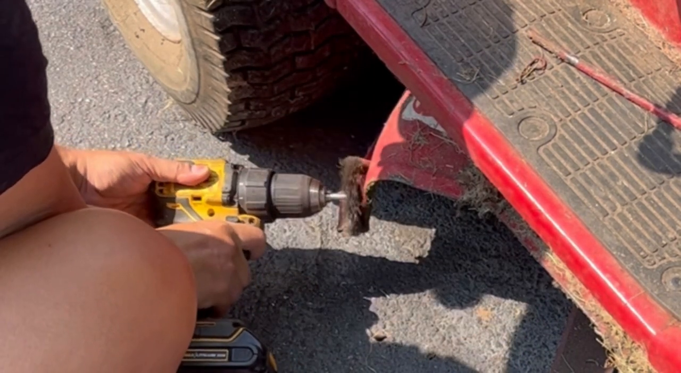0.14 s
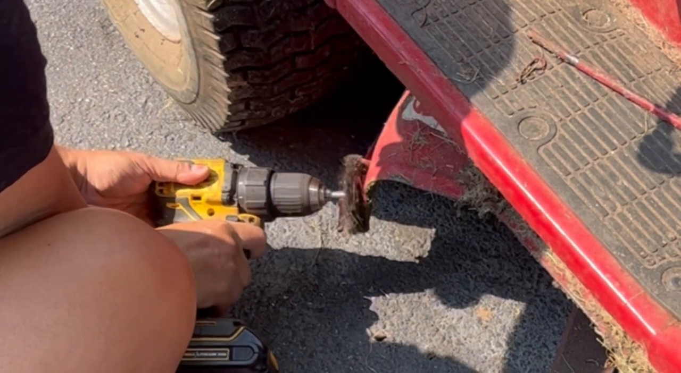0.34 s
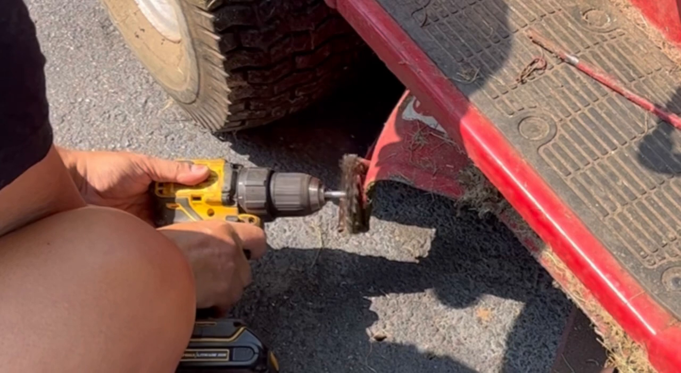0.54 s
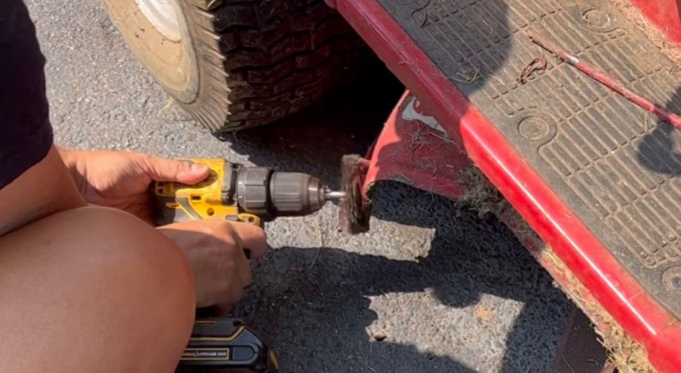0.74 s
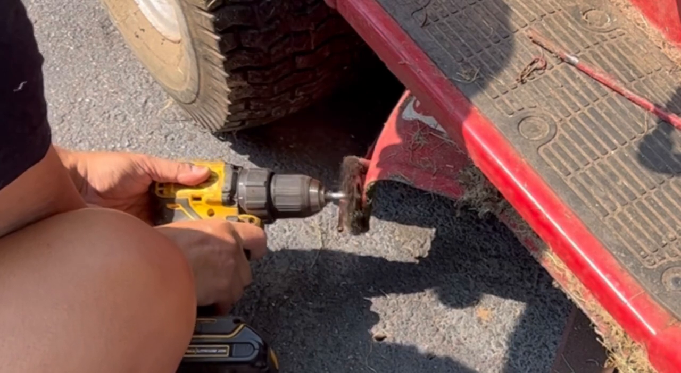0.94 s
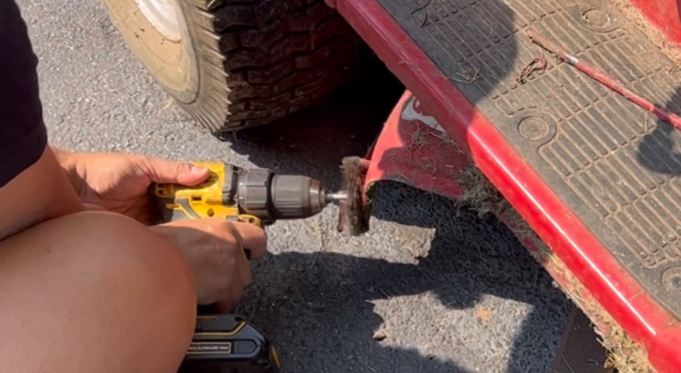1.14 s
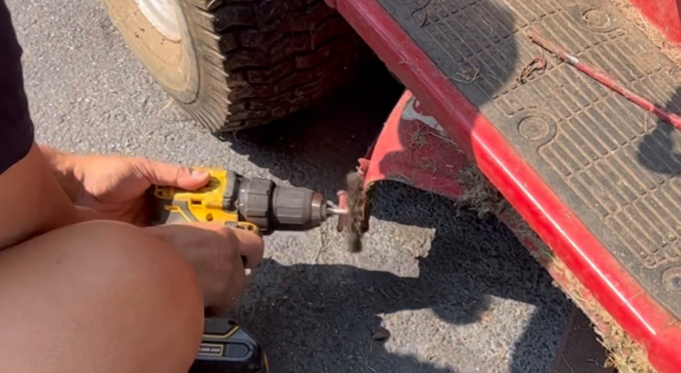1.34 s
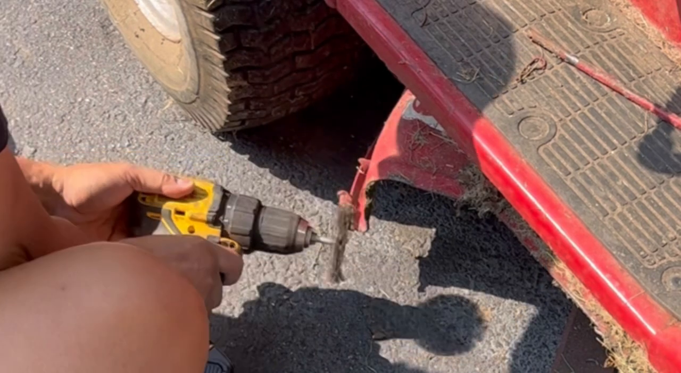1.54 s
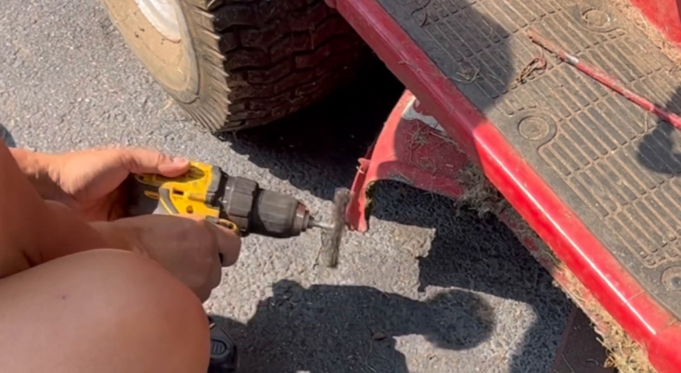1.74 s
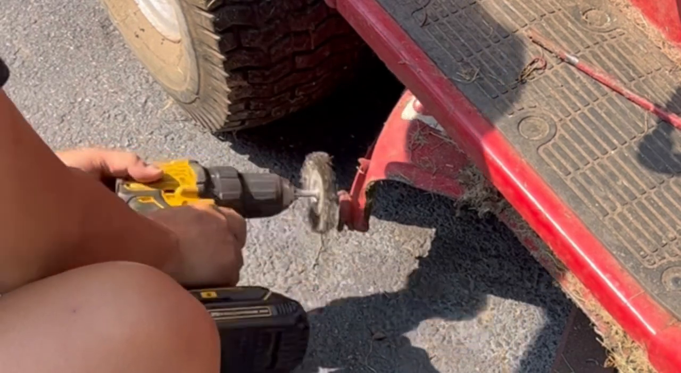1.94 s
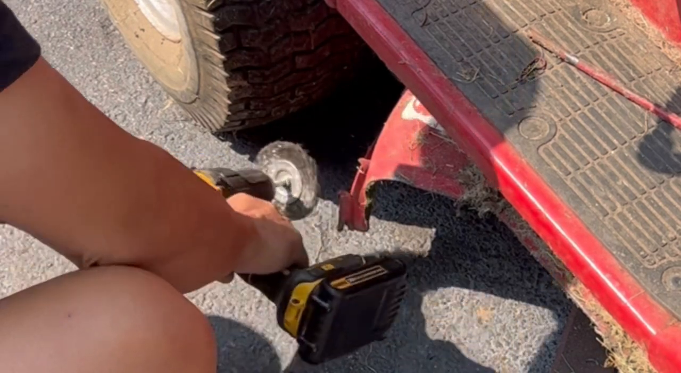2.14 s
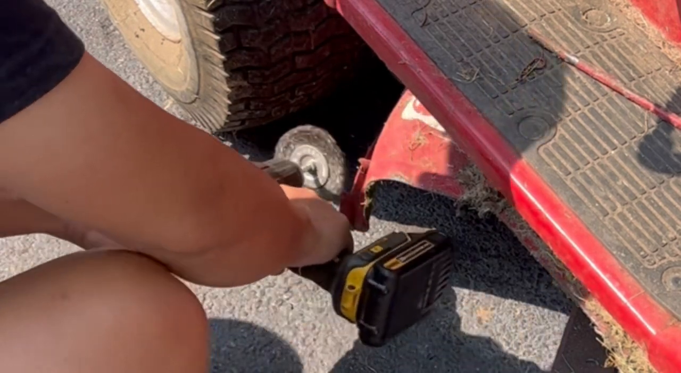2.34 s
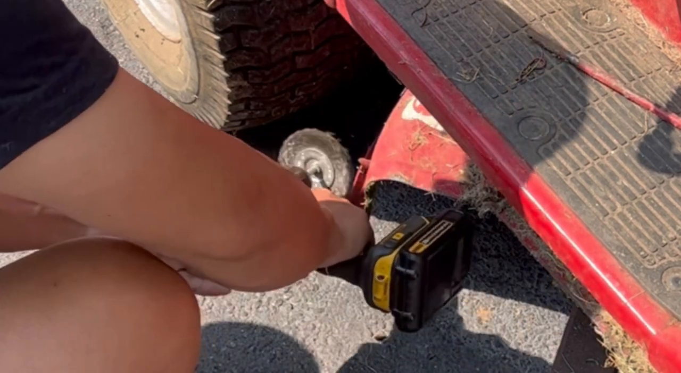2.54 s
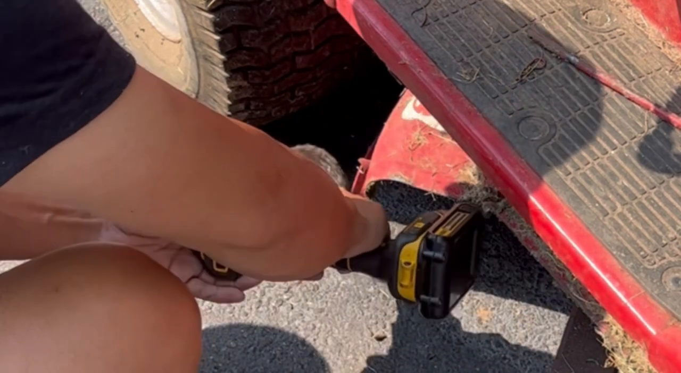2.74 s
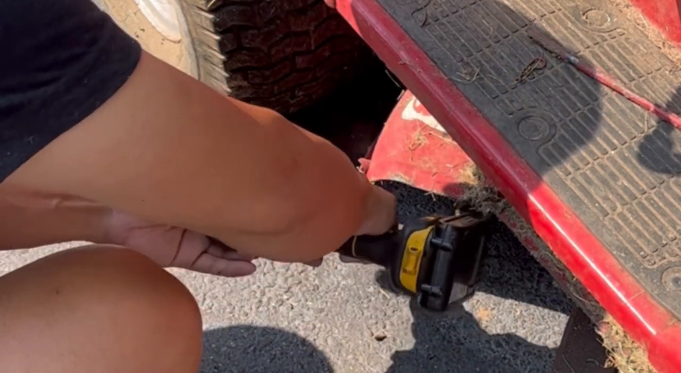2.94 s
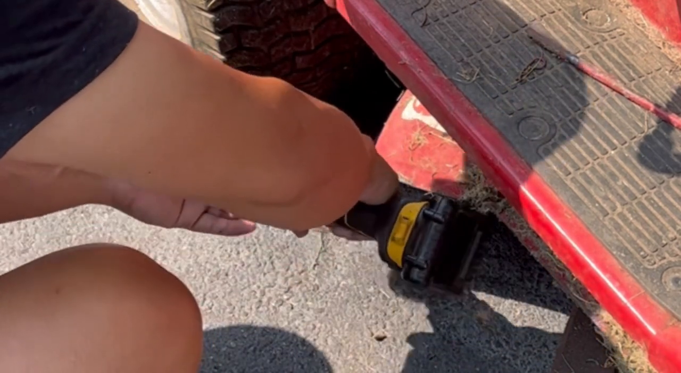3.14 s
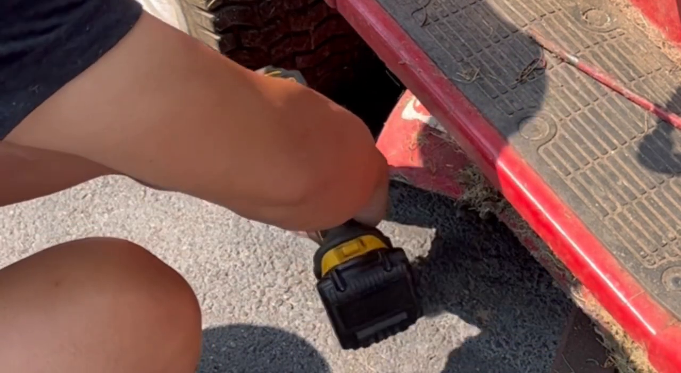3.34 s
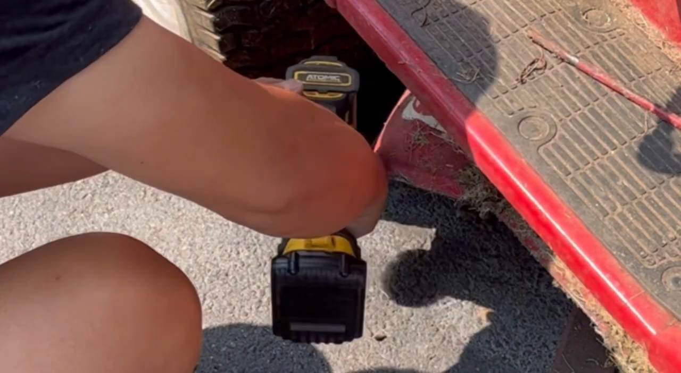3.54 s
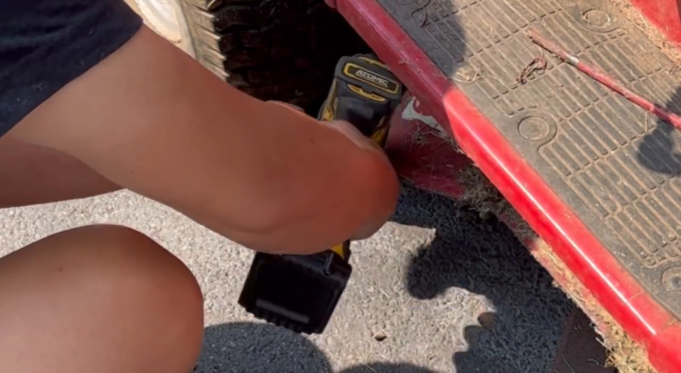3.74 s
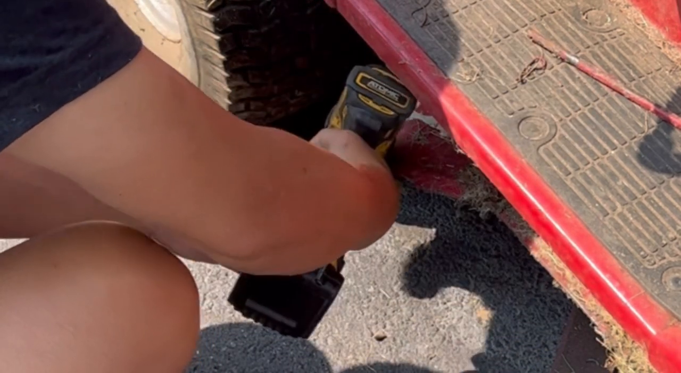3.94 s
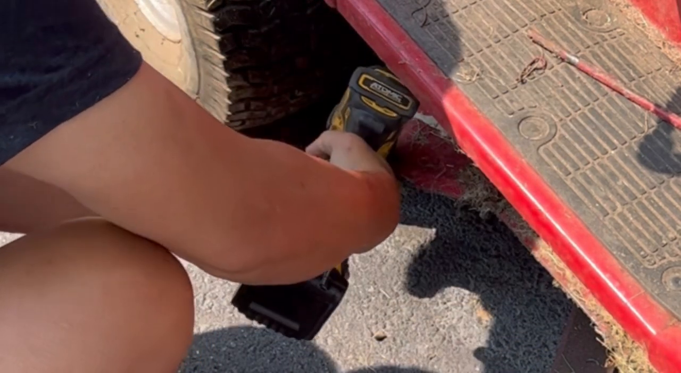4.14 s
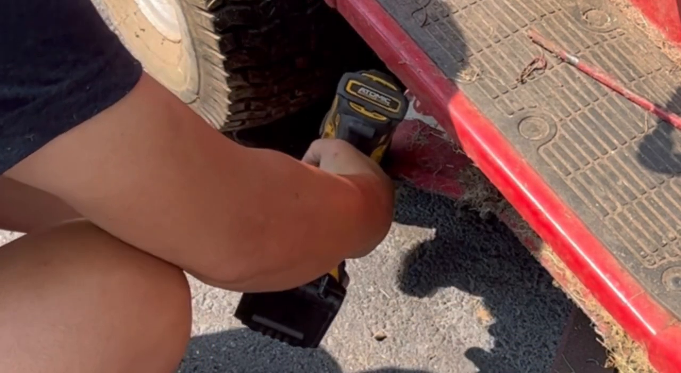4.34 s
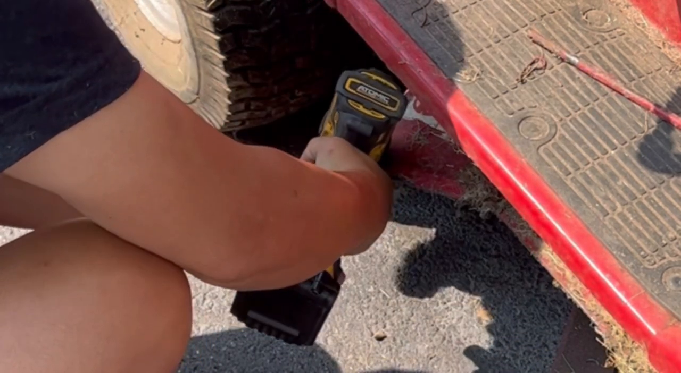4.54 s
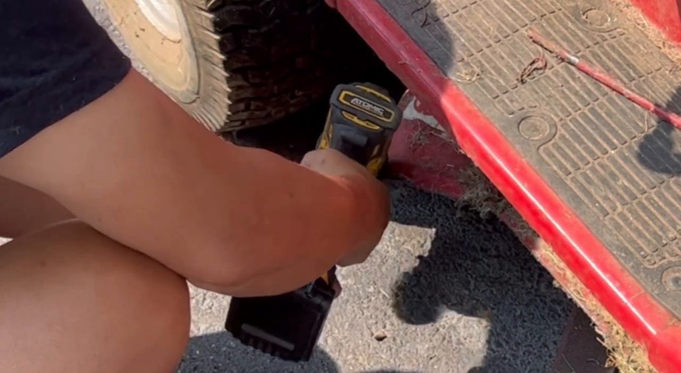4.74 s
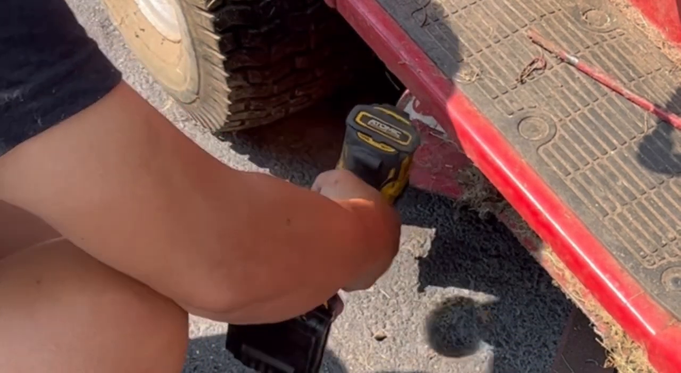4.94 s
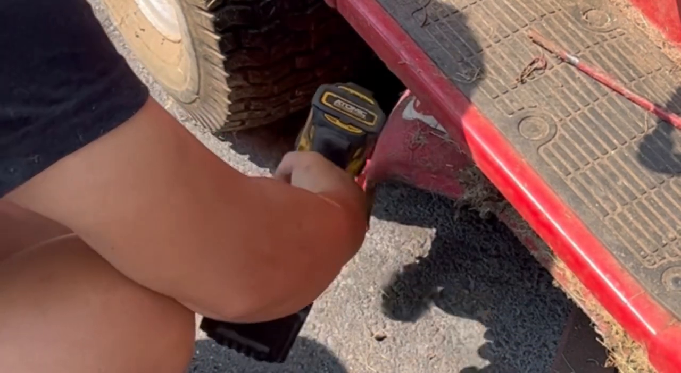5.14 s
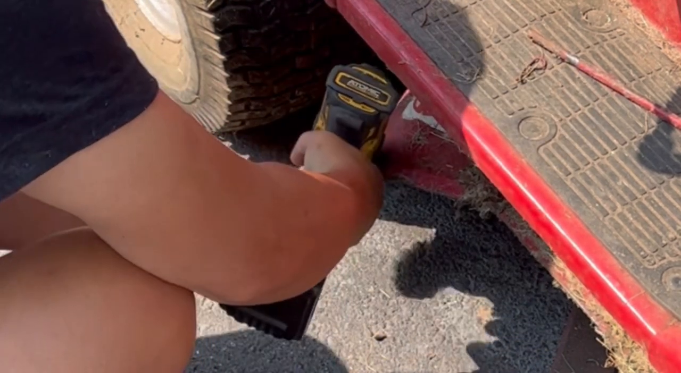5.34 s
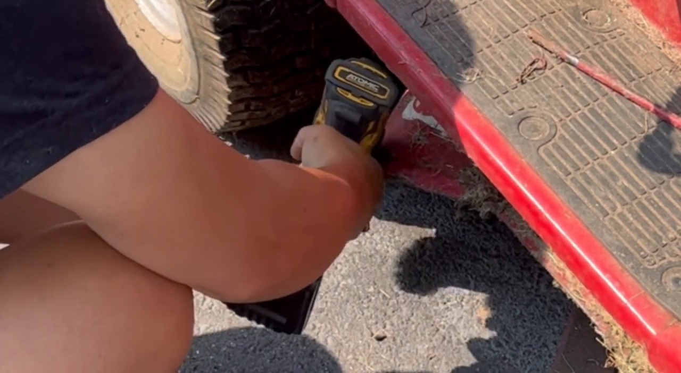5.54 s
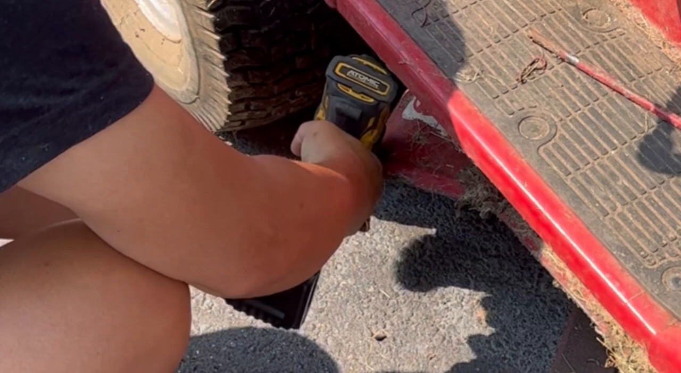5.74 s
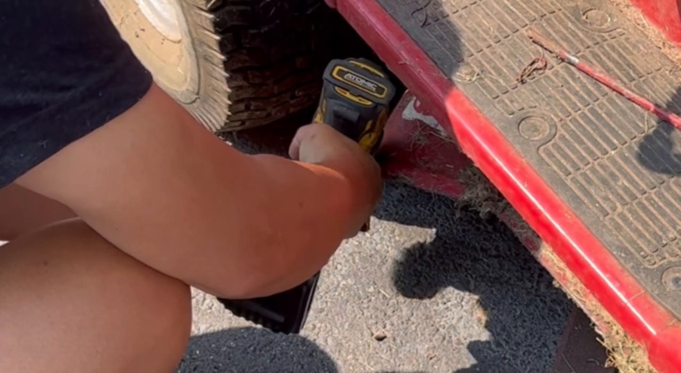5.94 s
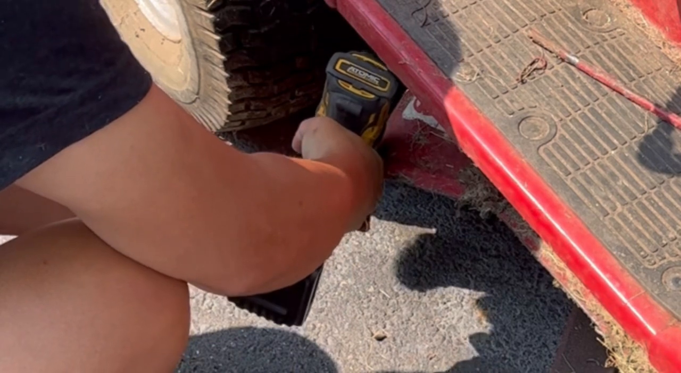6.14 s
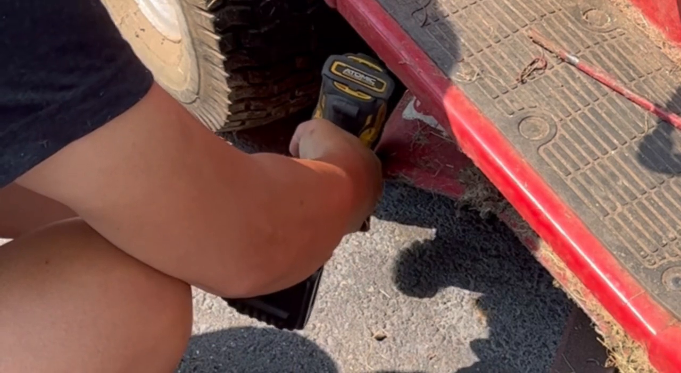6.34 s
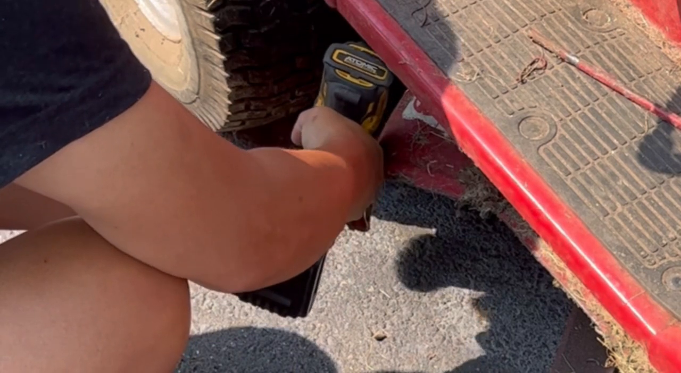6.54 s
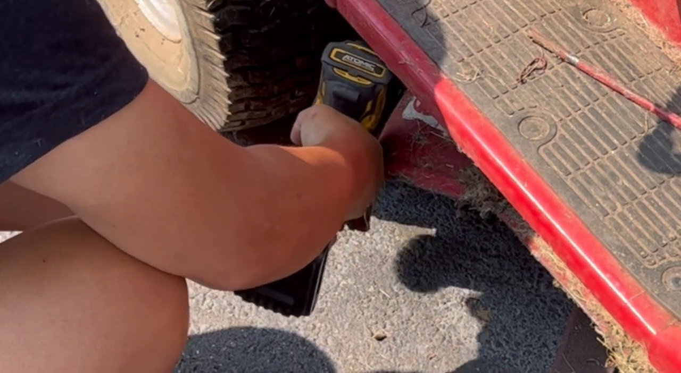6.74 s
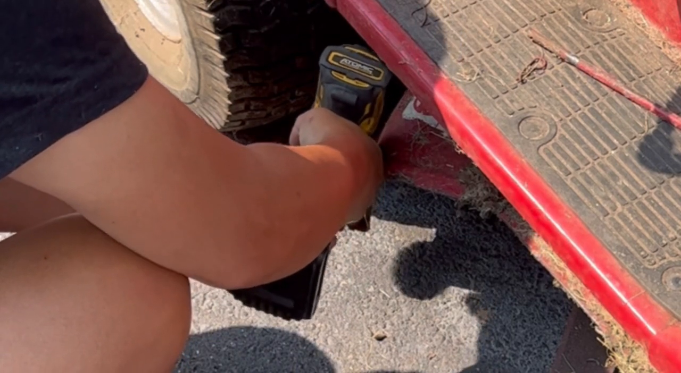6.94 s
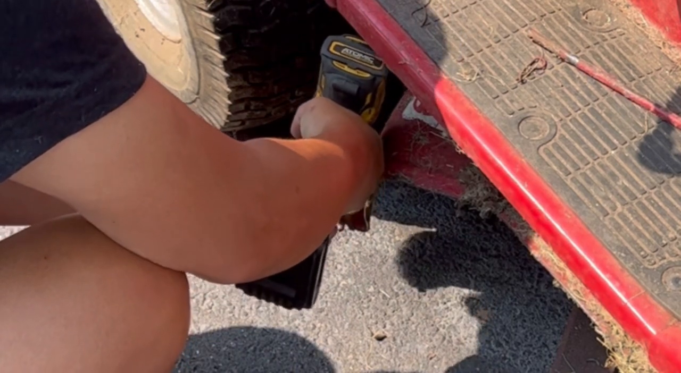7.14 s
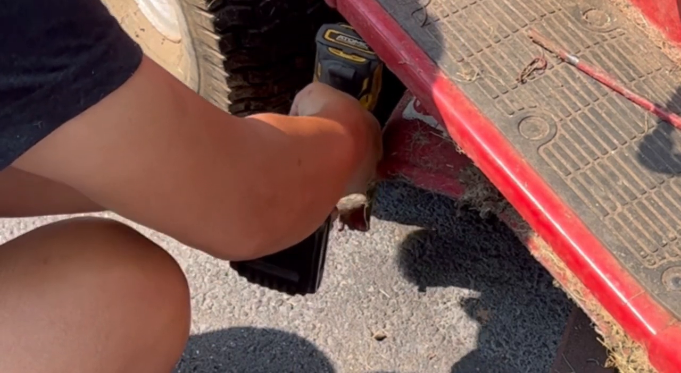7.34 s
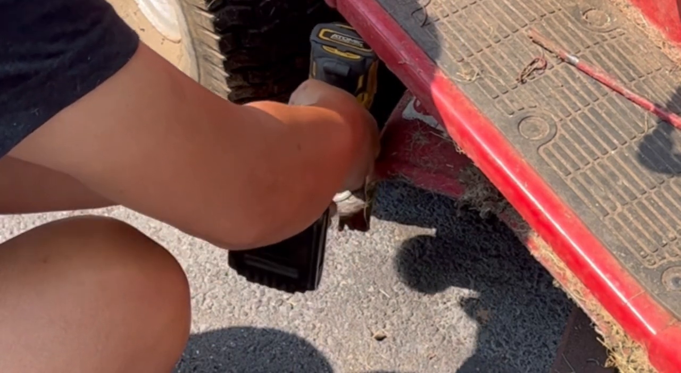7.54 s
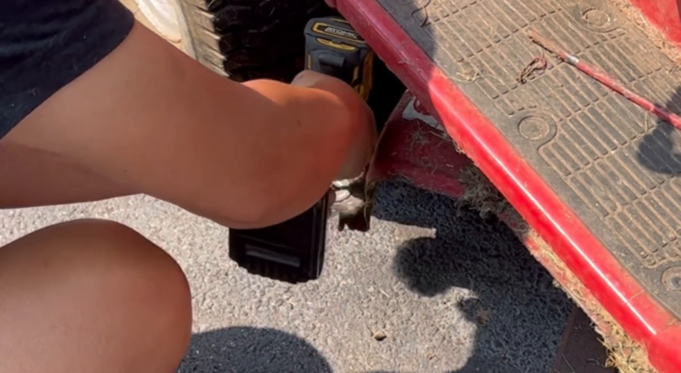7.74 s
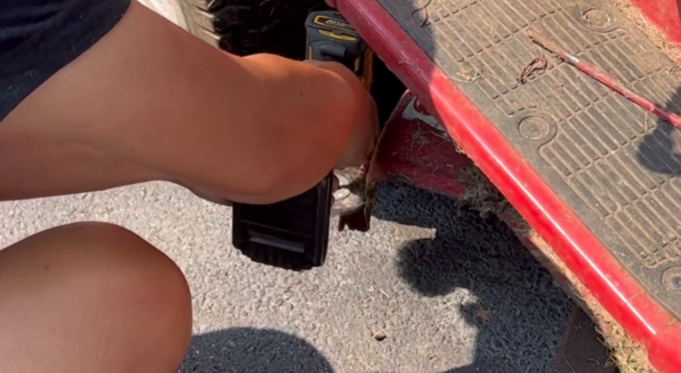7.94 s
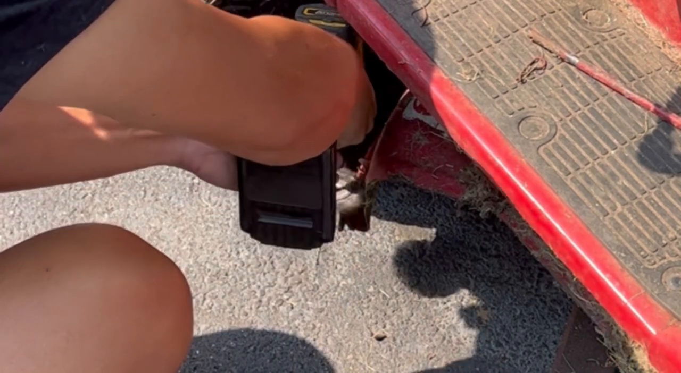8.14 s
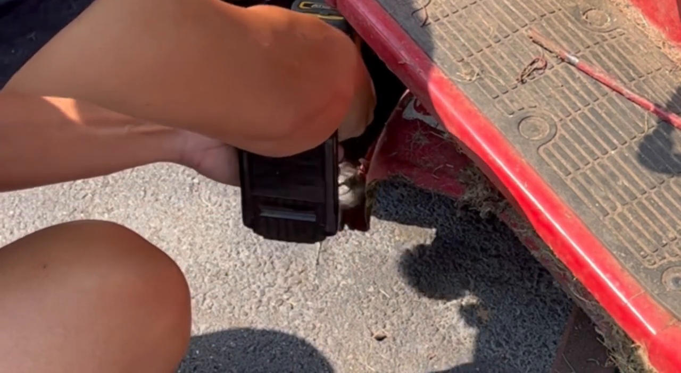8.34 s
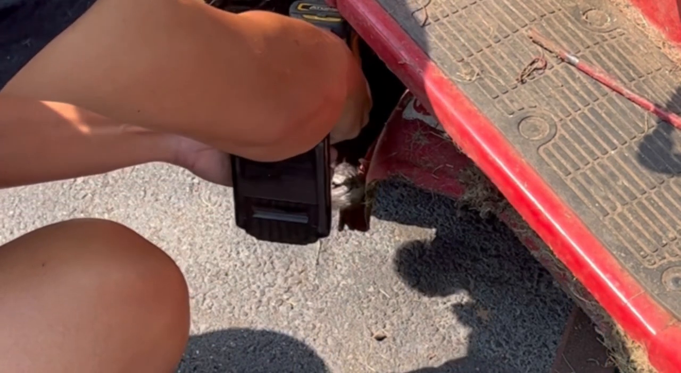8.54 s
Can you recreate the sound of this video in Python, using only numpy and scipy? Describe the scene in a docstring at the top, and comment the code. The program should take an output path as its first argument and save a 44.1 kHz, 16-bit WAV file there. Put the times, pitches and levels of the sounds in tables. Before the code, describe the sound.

Outdoors, close to the work, a low small engine chugs throughout. A drill-driven wire wheel sizzles brightly on a thin steel edge, lifts away into whine and swish, briefly touches the metal, dips in speed, then revs higher. It scrubs a hollow deck with a drumming roar, snags once with sharp clanks, and rasps deeper beneath.

```python
"""Outdoors, a small engine chugs throughout while a cordless drill spins a wire wheel on a steel mower deck.
First the wires sizzle on the ringing edge of the sheet; then the wheel runs free and brushes the deck once.
The trigger is let go for an instant, the wheel scrubs the hollow deck faster, snags once with clanks,
and at last rasps on a panel farther under. Random wire strikes drive filters and damped modes for the brush;
whine, rattle and swish follow the motor speed, which the trigger sets and the drag of the work pulls down."""
import sys
import numpy as np
from scipy import signal
from scipy.fft import rfft, irfft
from scipy.io import wavfile
from scipy.ndimage import map_coordinates

SR = 44100
rng = np.random.default_rng(int(sys.argv[2]) if len(sys.argv) > 2 else 0)


def inscribe(sig):
    """Save sig as 16-bit PCM at rate SR to the path in sys.argv[1].

    A 1-D sig is mono; a 2-D sig holds one channel per row.
    Samples are clipped to [-1, 1] before scaling.
    """
    pcm = np.round(np.clip(np.atleast_2d(sig).T, -1, 1) * 32767)
    wavfile.write(sys.argv[1], SR, pcm.astype(np.int16))


N = 378819
T = np.arange(N) / SR
HZ = np.fft.rfftfreq(N, 1 / SR)


def amp(db):
    """Decibels to gain."""
    return 10 ** (np.asarray(db) / 20)


def unit(x):
    """Scales to rms 1."""
    return x / np.sqrt(np.mean(x ** 2) + 1e-20)


def curves(rows):
    """Every column of a time table, interpolated at every sample."""
    times, *columns = np.transpose(rows)
    return [np.interp(T, np.sort(times), column) for column in columns]


def read(points, hz=HZ):
    """A frequency table, interpolated on a log axis."""
    f, value = np.transpose(points)
    return np.interp(np.log(hz + 1), np.log(np.sort(f) + 1), value)


def drift(rate_hz):
    """Slow random motion of rms 1."""
    coarse = T[::64]
    points = rng.standard_normal(4000)
    motion = map_coordinates(points, [coarse * rate_hz * 2], order=3, mode="mirror")
    return np.interp(T, coarse, unit(motion))


def shaped(x, gain):
    """Filters x by a gain per frequency; rms 1."""
    return unit(irfft(rfft(x) * gain, N))


def ringing(modes):
    """Frequency response of a set of damped modes."""
    response = 0
    for hz, width, db in modes:
        response = response + amp(db) / (1 + 1j * (HZ ** 2 - hz ** 2) / (width * HZ + 1e-6))
    return response


def wandering(strikes, modes, swing_db, per_s):
    """Each mode swells and fades at random on its own; rms 1."""
    spectrum = rfft(strikes)
    voices = [irfft(spectrum * ringing([mode]), N) * amp(swing_db * drift(per_s)) for mode in modes]
    return unit(sum(voices))


def resonate(x, hz, width):
    """A resonance whose centre follows the curve hz; rms 1."""
    turn = np.exp(2j * np.pi * np.cumsum(hz) / SR)
    r = np.exp(-np.pi * width / SR)
    # shift the centre down to 0 Hz, smooth there, shift back up
    return unit((turn * signal.lfilter([1 - r], [1, -r], x / turn)).real)


RIPPLE_DB = 3  # depth of the fine ripple, as the standard deviation of its random points


def fine_ripple(depth_db, spacing_hz):
    """Random fine ripple over frequency, which gives the hiss and swish a slightly tonal grain."""
    ripple = np.interp(HZ / spacing_hz, np.arange(2000), rng.standard_normal(2000))
    return amp(depth_db * ripple)


def turns(rate, waver):
    """Angle of a shaft whose speed is never quite steady."""
    return 2 * np.pi * np.cumsum(rate * (1 + waver * drift(25))) / SR


def push(start, length, attack, release):
    """Envelope that rises, holds and dies away exponentially."""
    rise = 1 - np.exp(-np.clip(T - start, 0, length) / attack)
    return rise * np.exp(-np.clip(T - start - length, 0, 1) / release)


def strokes(rows):
    """Envelope of short contacts: a quick bite (1.2 ms) and a slower release (4.4 ms)."""
    envelope = 0
    for s, length, db in rows:
        ramp = np.minimum((T - s) / 0.0012, (s + length - T) / 0.0044)
        envelope = envelope + amp(db) * np.clip(ramp, 0, 1)
    return envelope


# the engine's exhaust note, four times the firing rate:
# (time [s], note [Hz], level of the note [dB], level of its octave [dB])
EXHAUST_NOTE = [(0.1, 103, -32, -33.5), (1.22, 102.7, -30.5, -41), (2.04, 104.7, -36.5, -38.5),
                (2.88, 105.2, -24.5, -56), (2.95, 105.4, -26.5, -31), (3.42, 103.9, -26, -32.5),
                (3.84, 104.2, -32, -31), (4.38, 104.6, -27, -30.5), (4.89, 105.3, -22.5, -31.5),
                (5.97, 103.9, -21.5, -46), (6.32, 104.1, -22.5, -30.5), (6.84, 104.9, -22.5, -37),
                (7.17, 104.5, -22.5, -31.5), (7.37, 104.3, -23.5, -39.5), (8.48, 103.5, -23.5, -39),
                (8.5, 103.3, -24.5, -36)]
# the engine's other orders: (multiple of the firing rate [-], level [dB])
ENGINE_ORDERS = [(2, -45), (3, -65), (5, -41.5), (6, -37.5), (7, -38.5), (9, -44), (10, -46.5), (11, -44.5),
                 (12, -41), (13, -68), (14, -48), (16, -54), (18, -76), (28, -51.5)]
# the overtones come and go:
# (time [s], level shift of the other orders [dB], level of the hum at 20 times the firing rate [dB])
OVERTONE_LEVELS = [(0, -1, -56), (1.4, 1.5, -51), (2.1, -1, -53), (2.45, 0.5, -47), (3.45, -2, -42.5),
                   (3.7, 0.5, -47), (5.1, -1, -43.5), (6.5, -5.5, -50), (7.35, -5.5, -39), (7.7, 2, -45),
                   (8.59, 0, -52)]
# colour of the low rumble: (frequency [Hz], relative level per Hz [dB])
RUMBLE_COLOUR = [(15, -33), (35, 5), (52, 16.5), (80, 12.5), (130, 7), (250, 2), (450, -14), (1500, -56)]


def engine(smear=.19):
    """A single cylinder fires about 26 times a second; the muffler smears each puff and booms on order four."""
    note_hz, note_db, octave_db = curves(EXHAUST_NOTE)
    cycle = turns(note_hz / 4, waver=.002)
    overtones_db, hum_db = curves(OVERTONE_LEVELS)
    orders = [(round(k), amp(db + overtones_db)) for k, db in ENGINE_ORDERS]
    orders += [(4, amp(note_db)), (8, amp(octave_db)), (20, amp(hum_db))]
    puffs = np.zeros(N)
    for k, level in orders:
        phase = k * cycle + smear * k ** 2 + .5 * drift(0.498)
        puffs += level * np.cos(phase) * (1 + 0.051 * drift(5.5))
    # the rumble throbs once per firing
    throb = rng.standard_normal((2, N)) * (1 + 1.1 * np.cos(cycle))
    rumble = shaped(throb, amp(read(RUMBLE_COLOUR)))
    spread = np.array([[.3], [-.3]])  # left, right
    return np.sqrt(2) * puffs + amp(-34.5) * (rumble[0] + spread * rumble[1])


# dull knocks as the drill is swung and kicks:
# (time [s], level [dB], pitch [Hz], time to the envelope's peak and its decay [s])
DRILL_KNOCKS = [(3.01, -15.5, 69.5, 0.01), (3.09, -24, 65.5, .012), (3.44, -16, 71.4, 0.011),
                (3.563, -19, 62.2, 0.0093), (4.635, -22, 70, .012), (4.754, -20, 94.9, 0.01),
                (4.793, -11, 109.6, 0.0033), (5.728, -17, 65.5, 0.0069), (6.196, -21, 64.5, 0.0098)]


def knocks():
    """Low, heavily damped blows."""
    out = np.zeros(N)
    for s, db, hz, decay in DRILL_KNOCKS:
        age = np.clip(T - s, 0, .5)
        envelope = (age / decay) * np.exp(1 - age / decay)
        out -= amp(db) * np.sin(2 * np.pi * hz * age) * envelope
    return out


# drag of the work on the wheel: (time [s], speed lost [motor turns per s])
WORK_DRAG = [(2.84, 0), (2.91, 7), (2.96, 6), (3.02, 0), (3.52, 0), (3.65, 6), (3.72, 3), (3.82, 8),
             (3.95, 0), (4.25, 4), (4.33, 14), (4.47, 15), (4.55, 22), (4.7, 23), (4.8, 66), (4.85, 24),
             (4.9, 8), (5.02, 1), (5.26, 0), (5.5, 20.5), (6, 20), (6.2, 23.5), (6.85, 20), (7.15, 21),
             (7.21, 28), (7.3, 23), (7.52, 19), (7.62, 25), (7.76, 24), (7.8, 41), (7.95, 27), (8.18, 24),
             (8.25, 33), (8.35, 31), (8.5, 22)]


def speed_sag():
    """The drag of the work takes turns per second off the motor."""
    return curves(WORK_DRAG)[0]


# finger moves on the trigger: (time [s], speed asked for [motor turns per s], time to settle [s])
TRIGGER_MOVES = [(0, 244, .05), (1.25, 262, .05), (1.385, 310, .13), (1.53, 264, .07), (1.93, 260, .05),
                 (2.2, 264.5, .08), (2.47, 260, .04), (2.6, 264, .05), (2.8, 259, .1), (3.095, 150, .25),
                 (3.272, 332, .034), (3.84, 340, .04), (4.472, 394.5, .038)]
UNSTEADY = .0012  # rms share by which the speed wanders


def motor_speed(sag):
    """Turns per second: the motor settles on what the trigger asks for, less the sag under load."""
    speed = np.full(N, float(TRIGGER_MOVES[0][1]))
    for s, asked, settle in TRIGGER_MOVES[1:]:
        at = round(s * SR)
        speed[at:] = asked + (speed[at] - asked) * np.exp(-T[:N - at] / settle)
    return (speed - sag) * (1 + UNSTEADY * drift(3))


def pace(speed):
    """Motor speed as a share of its highest."""
    return speed / speed.max()


# gear rattle as the drill is turned about: (time [s], level [dB])
RATTLE_LEVEL = [(0, -35), (1.25, -33.5), (1.5, -32.5), (2.3, -35), (2.9, -31.5), (3.6, -31), (5.2, -32),
                (7, -33.5), (7.8, -33), (8.59, -35.5)]
# modes of the plastic housing that it shakes: (frequency [Hz], width [Hz], relative level [dB])
HOUSING_MODES = [(786, 38, -8), (1046, 89, 5), (1318, 300, -1), (1786, 104, -1)]


def gear_rattle(speed):
    """Gear teeth chatter once a motor turn and shake the plastic housing."""
    chatter = rng.standard_normal((2, N)) * (1 + 0.2 * np.cos(turns(speed, 0.0021)))
    return amp(curves(RATTLE_LEVEL)[0]) * shaped(chatter, ringing(HOUSING_MODES))


# gearbox resonances that the whines at 16 and 19 times the shaft sweep through: (frequency [Hz], level [dB])
LOW_WHINE_RESPONSE = [(3400, -39), (4050, -33), (4250, -32.5), (4500, -26), (4750, -27), (5000, -30),
                      (5300, -35), (5450, -34), (5700, -31), (5980, -36), (6300, -35)]
HIGH_WHINE_RESPONSE = [(4000, -42), (4400, -39), (5000, -43), (5600, -40), (6200, -35), (6450, -33),
                       (6900, -29.5), (7100, -28.5), (7500, -27.5)]
# each whine swells and fades as the drill is turned about: (time [s], level shift [dB])
LOW_WHINE_SWING = [(1.3, -6), (1.5, 0), (1.7, -4), (1.85, -8), (2, -2), (2.09, -9), (2.2, -3), (2.3, 5),
                   (2.45, -2), (2.54, -9), (2.7, 0), (2.82, -4), (2.95, -1), (3.15, -4), (3.25, -2),
                   (3.31, 5), (3.5, 0), (3.7, -8), (3.9, -1), (4.22, 1), (4.35, -7), (4.75, -6), (4.84, 1),
                   (4.94, 3), (5.1, -4), (5.7, -8), (6, -1), (6.3, -4), (6.9, 4), (7.2, -9), (8.59, -10)]
HIGH_WHINE_SWING = [(1.35, -10), (1.5, 0), (2.15, -1), (2.3, -12), (2.43, 3), (2.9, -3), (3.2, 0), (3.3, 5),
                    (3.5, -1), (3.73, -7), (3.9, 0), (4.35, 1), (4.6, -2), (4.8, -4), (4.95, 2), (5.08, -5),
                    (5.22, 3), (5.4, 0), (7.12, 0), (7.23, -6), (7.32, 1), (7.8, -1), (7.99, 1.5),
                    (8.12, -17), (8.26, 2.5), (8.37, -12), (8.5, 2)]
# weaker motor orders: (multiple of the shaft [-], level at full speed before radiation [dB], width [Hz])
FUZZY_ORDERS = [(4, -38, 30), (8, -47, 110), (14, -50, 60)]
# how well the drill body radiates them: (frequency [Hz], gain [dB])
BODY_RADIATION = [(900, -5), (1150, 7.5), (1350, -6), (1550, -4.5), (2100, 12.5), (2650, 13.5), (2950, 0),
                  (3130, 11.5), (3700, -14), (4600, 16), (5200, -16)]
BACKLASH_RAD = 1.9  # play of the loose gears, rms


def gear_whine(speed, rough=0.19, fade_db=1.6, jitter_rad=0.47):
    """Two clear tones locked to the shaft, swelling as the drill is turned, and fuzzier orders from loose gears."""
    shaft = turns(speed, waver=0.001065)
    clear = [(16, LOW_WHINE_RESPONSE, LOW_WHINE_SWING), (19, HIGH_WHINE_RESPONSE, HIGH_WHINE_SWING)]
    out = np.zeros(N)
    for k, response, swing in clear:
        level_db = read(response, k * speed) + curves(swing)[0] + fade_db * drift(4.5)
        level = amp(level_db) * (1 + rough * drift(22))
        out += level * np.cos(k * shaft + jitter_rad * drift(70))
    for k, db, width in FUZZY_ORDERS:
        tone = np.sqrt(2) * np.cos(k * shaft + BACKLASH_RAD * drift(width / 2))
        fuzz = tone * (1 + rough * drift(width / 2))
        out += amp(db + read(BODY_RADIATION, k * speed)) * fuzz * pace(speed) ** 3.0
    return out


def wire_strikes(speed, per_s, spread_db, wobble, flutter_db):
    """Two unrelated showers of wire tips; the uneven wheel presses harder once a turn and the hand shakes."""
    wheel = turns(speed / 14, .02)  # the wheel turns once per 14 motor turns
    hit = rng.random((2, N)) < per_s * speed / speed.mean() / SR
    size = rng.laplace(size=(2, N))[hit]
    strikes = np.zeros((2, N))
    strikes[hit] = np.sign(size) * amp(spread_db * np.minimum(abs(size), 4))
    return strikes * (1 + wobble * np.cos(wheel)) * amp(flutter_db * drift(18))


# swish of the spinning wires and the motor fan: (frequency [Hz], relative level per Hz [dB])
SWISH_COLOUR = [(300, -17), (900, -1.5), (2400, -5), (3100, -3), (3700, 4.5), (4200, 1), (4700, -1.5),
                (5300, -7.5), (6500, -0.5), (8100, 2), (10500, -3), (12000, -4.5), (13500, -4),
                (15500, -11.5)]
# parts of the deck that ring under even a light touch: (frequency [Hz], width [Hz], relative level [dB])
LIGHT_TOUCH_MODES = [(1940, 140, 11), (2240, 370, -3), (2580, 220, 8.5), (3550, 250, -4.5), (3870, 96, 4.5),
                     (4670, 95, 4)]
FIZZ_HZ = 7900  # the swish above this has an extra growth with speed


def swish(speed, sag, hiss_db=-25.5, hiss_power=1.73, ring_db=-31.5, ring_power=8.2,
          fizz_db=1, fizz_power=0.77, load_db=2.5, full_sag=22):
    """Wires cut the air and brush lightly: louder and brighter as a power of speed, a little louder under load."""
    strikes = wire_strikes(speed, per_s=20000, spread_db=1.0, wobble=0.03, flutter_db=0.5)
    ring = wandering(strikes, LIGHT_TOUCH_MODES, swing_db=2.5, per_s=5)
    hiss = shaped(strikes, amp(read(SWISH_COLOUR)) * fine_ripple(depth_db=RIPPLE_DB, spacing_hz=59.15))
    fizz = irfft(rfft(hiss) * (HZ > FIZZ_HZ), N)
    fast = pace(speed)
    load = np.minimum(sag / full_sag, 1)
    hiss = hiss - fizz + fizz * amp(fizz_db) * fast ** fizz_power
    hiss_level = amp(hiss_db + load_db * load) * fast ** hiss_power
    return hiss_level * hiss + amp(ring_db) * fast ** ring_power * ring


# the wheel works its way deeper under the deck: (time [s], level [dB])
REACH_LEVEL = [(7.2, -52), (7.9, -42), (8.2, -36), (8.59, -36)]
# modes of the panel that rings there: (frequency [Hz], width [Hz], relative level [dB])
INNER_PANEL_MODES = [(980, 60, -2), (1450, 67, 11), (2120, 81, 8), (2970, 60, -7), (3660, 130, -8),
                     (4598, 70, -5)]


def inner_panel(speed):
    """Far under the deck the wires rasp roughly on another panel."""
    strikes = wire_strikes(speed, per_s=3000, spread_db=3.0, wobble=0.21, flutter_db=5.5)
    return amp(curves(REACH_LEVEL)[0]) * shaped(strikes, ringing(INNER_PANEL_MODES))


# the wires catch and rasp: (time [s], length [s], level [dB])
WIRE_SNAGS = [(4.727, 0.022, -15.5), (4.75, 0.016, -18), (4.766, 0.018, -20), (4.778, 0.026, -19.5),
              (6.41, 0.035, -24), (7.785, 0.033, -28)]
# colour of that rasp: (frequency [Hz], relative level per Hz [dB])
SNAG_COLOUR = [(200, 15), (600, -26), (1300, 8), (2000, 5), (3100, 13.5), (5000, 6), (8000, 4), (12000, -1),
               (15500, -25)]
# the wheel skids over a rim and makes it shriek: (time [s], length [s], level [dB])
RIM_SKIDS = [(7.786, .043, -26.5)]
# modes of the rim: (frequency [Hz], width [Hz], relative level [dB])
RIM_MODES = [(2490, 60, -9), (3910, 70, -1), (5200, 116, -7), (6790, 160, -6)]


def snags(speed):
    """Bunches of wires catch and spring free, or skid over a ringing rim."""
    strikes = wire_strikes(speed, per_s=3700, spread_db=0.0, wobble=0.05, flutter_db=-1.9)
    rasp = strokes(WIRE_SNAGS) * shaped(strikes, amp(read(SNAG_COLOUR)))
    shriek = strokes(RIM_SKIDS) * shaped(strikes, ringing(RIM_MODES))
    return rasp + shriek


# the snagged wheel bangs on the deck: (time [s], peak level [dB])
BANGS = [(4.731, -7.5), (4.743, -12), (4.761, -14), (4.768, -8), (4.782, -12), (4.791, -11)]
# deck modes that clank: (frequency [Hz], width [Hz], relative level before the uneven mix [dB])
CLANK_MODES = [(1090, 44, -1), (1360, 35, -8), (1940, 30, 1), (2730, 55, -3), (2970, 50, 2), (3500, 35, 0),
               (4760, 50, -5), (5790, 120, -8)]


def clanks(uneven_db=3):
    """Each blow lands on another spot and rings the deck's modes in another mix."""
    out, t = np.zeros(N), T[:SR // 5]
    for s, db in BANGS:
        spots = rng.standard_normal((len(CLANK_MODES), 2))
        ring = np.zeros(len(t))
        for (hz, width, level), (a, b) in zip(CLANK_MODES, spots):
            strength = amp(level + uneven_db * a) * np.sign(b)
            ring += strength * np.sin(2 * np.pi * hz * t) * np.exp(-np.pi * width * t)
        out[round(s * SR):][:len(t)] += amp(db) * ring / abs(ring).max()
    return out


# pressure on the edge of the sheet, easing off as the drill is drawn away: (time [s], level [dB])
EDGE_LEVEL = [(0, -21.5), (.45, -18.5), (.9, -19), (1.23, -24), (1.275, -25.5), (1.6, -38.5), (2.1, -42),
              (2.4, -90)]


def edge_force():
    """Pressure of the wheel on the edge, as a gain."""
    return amp(curves(EDGE_LEVEL)[0])


# the wires glance off the edge again: (time [s], length [s], level [dB])
EDGE_GLANCES = [(2.86, 0.072, -38), (3.76, 0.076, -32), (3.86, 0.24, -35), (4.05, 0.2, -32)]
# hiss of the edge: (frequency [Hz], relative level per Hz [dB])
EDGE_COLOUR = [(120, -18), (250, 9), (400, 6.5), (600, -2), (900, -3), (1300, -3.5), (1900, -7.5),
               (3000, -1.5), (3700, 1), (4400, 0), (5100, 0.5), (6600, 1.5), (7500, 2), (9200, -60),
               (10500, -5), (13000, -6.5), (15500, -17)]
# ringing modes of the edge: (frequency [Hz], width [Hz], relative level [dB])
EDGE_MODES = [(2090, 36, -17), (2465, 29, -10), (2860, 78, -23), (3810, 106, -3), (4000, 64, -5),
              (4100, 42, -4.5), (4722, 42, 2), (5460, 55, -5.5), (5870, 130, -20), (6750, 150, -6),
              (6840, 50, -11), (9070, 100, -2.5), (9560, 150, -3)]
EDGE_LEFT_S = 1.268  # from here on only stray wires reach the edge; it rings only when glanced


def edge_scrub(speed, pressure, release=0.02):
    """Wire tips on the thin edge: a bright sizzle with ringing modes that swell as the contact point wanders."""
    strikes = wire_strikes(speed, per_s=8000, spread_db=2.0, wobble=0.078, flutter_db=0.55)
    ring = wandering(strikes, EDGE_MODES, swing_db=1.4, per_s=8.2) * amp(1.6 * drift(13.0))
    hiss = shaped(strikes, amp(read(EDGE_COLOUR)) * fine_ripple(depth_db=RIPPLE_DB, spacing_hz=57.6))
    pressed = np.clip((EDGE_LEFT_S - T) / release, 0, 1)
    glance = strokes(EDGE_GLANCES)
    return hiss * (pressure + glance) + ring * (pressure * pressed + glance)


# the wheel is pressed on the flat of the deck: (time [s], length [s], roar level [dB], level of the panel's
# boom [dB])
DECK_SCRUBS = [(2.858, 0.086, -29.5, -46), (3.587, 0.038, -27.5, -38), (3.679, .13, -38, -44),
               (3.815, 0.05, -34.5, -27.5), (4.257, 0.11, -23.5, -22.5), (4.386, 0.11, -25, -24.5),
               (4.474, .2, -23.5, -25), (4.675, 0.071, -33, -44), (4.738, 0.075, -24, -29),
               (5.315, 0.081, -26.5, -28), (5.408, 0.25, -26.5, -24), (5.686, 0.38, -28, -28),
               (6.051, 0.17, -30, -24.5), (6.233, 0.19, -30, -41), (6.38, 0.13, -32.5, -34),
               (6.507, .13, -35, -35), (6.613, 0.056, -28.5, -28), (6.683, 0.259, -33.5, -50),
               (6.936, 0.17, -31.5, -46), (7.156, 0.12, -35.5, -40), (7.26, 0.32, -38.5, -46.5),
               (7.562, 0.2, -34.5, -40.5), (7.778, 0.24, -32, -40.5), (8.04, 0.19, -33, -42),
               (8.226, 0.14, -36, -47), (8.379, .26, -39, -43)]
# the deck's broad roar: (frequency [Hz], relative level per Hz [dB])
DECK_COLOUR = [(60, -24), (180, -11), (260, 3.5), (400, -3.5), (640, 1), (800, -0.5), (1000, -0.5),
               (1350, -9), (1700, -27), (2500, -7), (5000, -9.5), (12000, -20)]
# panel modes of the deck: (frequency [Hz], width [Hz], relative level [dB])
DECK_MODES = [(264, 11, -18), (339.8, 7.2, -4.5), (379.7, 23, -5), (414, 11, -7), (478, 19, -5.5),
              (543.4, 5.4, 0), (643, 15, -8), (960, 15, -5.5)]
# higher modes that speak only under hard pressure: (frequency [Hz], width [Hz], relative level [dB])
BITE_MODES = [(990, 100, -4), (1434, 43, 3.5), (1910, 160, -10)]
PRESS_S, LIFT_S = 0.009, 0.047  # attack and release of a scrub
# the booming panel mode, and the rms share by which its pitch wanders at random
PANEL_HZ, PANEL_WIDTH_HZ, PANEL_WANDER = 268.9, 2.8, 0.012


def deck_scrub(speed, edge_pressure, idle_db=-44, edge_roar_db=-11, edge_boom_db=-16, bite_db=17):
    """Pressed flat on the deck, the wires drum its panels; work on the edge shakes them a little too."""
    strikes = wire_strikes(speed, per_s=5000, spread_db=2.0, wobble=0.15, flutter_db=1.24)
    roar = shaped(strikes, amp(read(DECK_COLOUR))) + amp(-1.0) * shaped(strikes, ringing(DECK_MODES))
    roar_power = amp(idle_db) ** 2 + (amp(edge_roar_db) * edge_pressure) ** 2
    boom_power = (amp(edge_boom_db) * edge_pressure) ** 2
    for s, length, roar_db, boom_db in DECK_SCRUBS:
        contact = push(s, length, PRESS_S, LIFT_S)
        roar_power = roar_power + (amp(roar_db) * contact) ** 2
        boom_power = boom_power + (amp(boom_db) * contact) ** 2
    boom = resonate(strikes, PANEL_HZ * (1 + PANEL_WANDER * drift(4.3)), PANEL_WIDTH_HZ)
    bite = amp(bite_db) * shaped(strikes, ringing(BITE_MODES))
    # the bite grows with the power of the roar, so it favours hard pressure
    return roar * np.sqrt(roar_power) + boom * np.sqrt(boom_power) + bite * roar_power


# phase between left and right by frequency: wide around 8 kHz and above 14 kHz, centred at 11-13 kHz:
# (frequency [Hz], left minus right [rad])
STEREO_PHASE = [(100, 0), (600, .4), (2000, 0), (3000, 1.1), (4000, 1.5), (5000, .1), (6000, -1.2),
                (7300, -1.9), (7850, -3.05), (8750, -3.2), (9100, -3.8), (10200, -4.7), (10800, -6.2),
                (13000, -6.4), (14200, -9.3)]
# stereo balance: (frequency [Hz], left minus right [dB])
STEREO_BALANCE = [(50, 0), (100, 3), (330, -2), (700, 3.5), (1300, 1), (2200, -1.5), (3500, 6), (5000, 6.5),
                  (6500, 2), (8000, -1)]
# sound that differs between left and right: (frequency [Hz], share of the power [-])
STEREO_SCATTER = [(100, 0.057), (300, 0.14), (700, 0.37), (1500, 0.12), (4000, 0.26), (6500, 0.009),
                  (8300, 0.00067), (10000, 0.013), (14000, 0.017)]


def stereo_image(common, scattered):
    """Common sound gets a phase and balance between left and right, scattered sound also opposite signs."""
    share = np.clip(read(STEREO_SCATTER), 0, 1)
    side = np.array([[.5], [-.5]])  # left, right
    balance = amp(side * read(STEREO_BALANCE))
    level = balance / np.sqrt(np.mean(balance ** 2, axis=0))
    placing = np.exp(1j * side * read(STEREO_PHASE)) * level
    together = np.sqrt(1 - share) * rfft(common)
    apart = 2 * side * np.sqrt(share) * rfft(scattered)
    return irfft(placing * (together + apart), N)


def scene():
    """Drill, brush and deck in front; the engine a little to the right."""
    sag = speed_sag()
    speed, edge_pressure = motor_speed(sag), edge_force()
    brush = swish(speed, sag) + inner_panel(speed) + snags(speed)
    brush = brush + edge_scrub(speed, edge_pressure) + deck_scrub(speed, edge_pressure)
    common, scattered = brush + gear_rattle(speed)
    common = common + gear_whine(speed) + knocks() + clanks()
    return engine() * amp([[-.6], [.6]]) + stereo_image(common, scattered)


CUT_HZ = 15350  # upper band limit


def record(dry):
    """Full-scale limit, then the band limit."""
    lowpass = signal.firwin(511, CUT_HZ, window=("kaiser", 9), fs=SR)
    return signal.oaconvolve(np.clip(dry, -1, 1), lowpass[None], "same")


dry = scene()
out = record(dry)
inscribe(out)
```